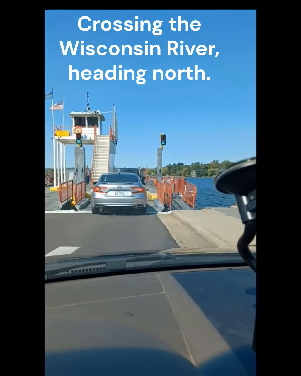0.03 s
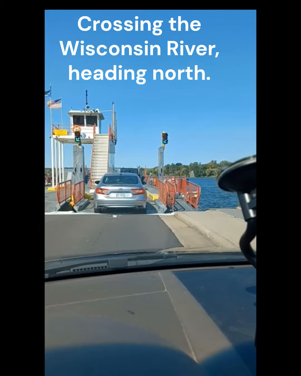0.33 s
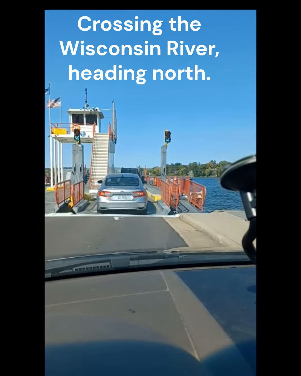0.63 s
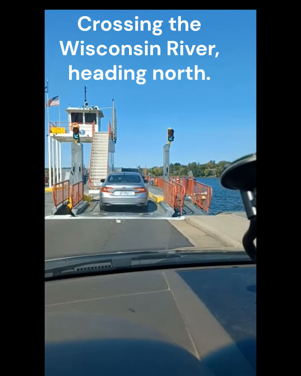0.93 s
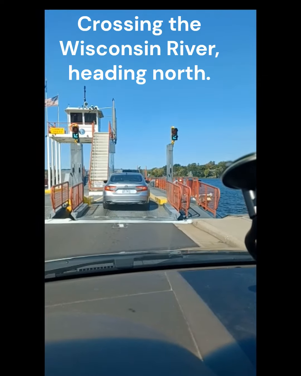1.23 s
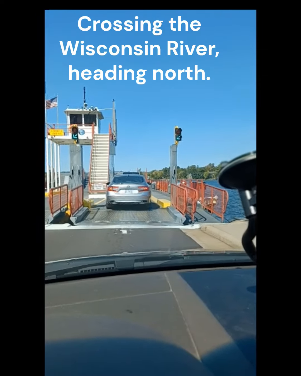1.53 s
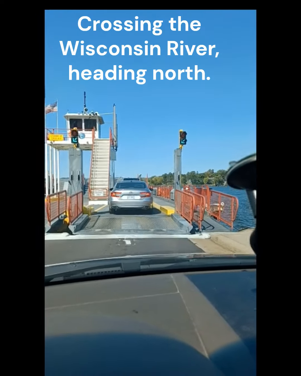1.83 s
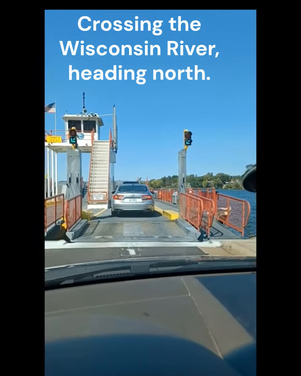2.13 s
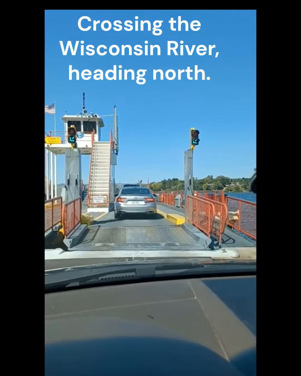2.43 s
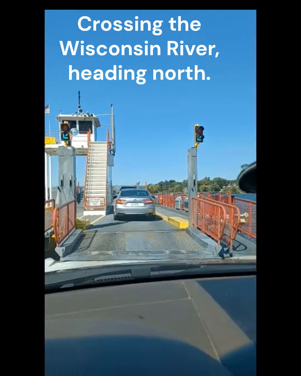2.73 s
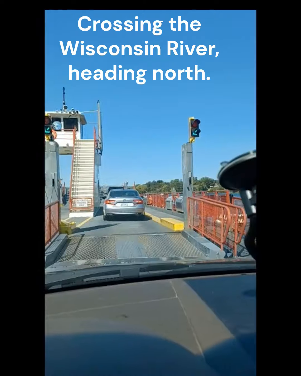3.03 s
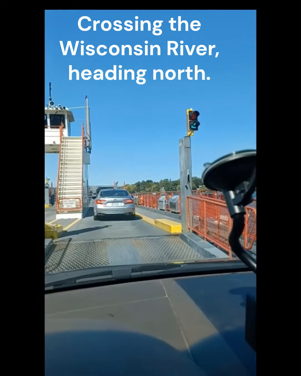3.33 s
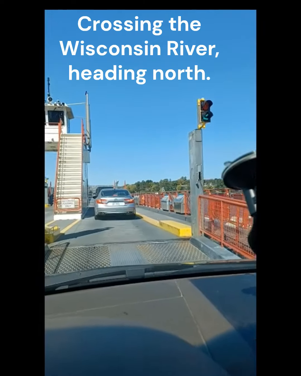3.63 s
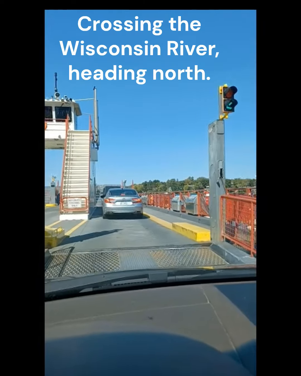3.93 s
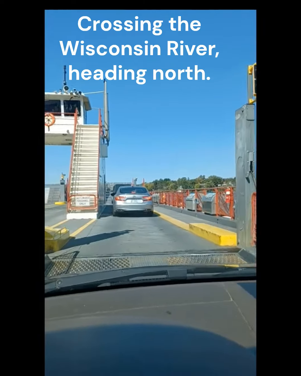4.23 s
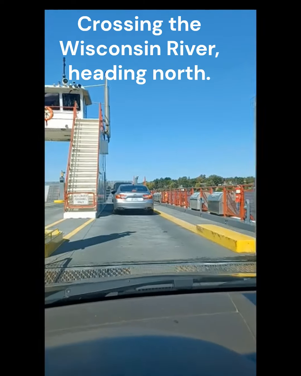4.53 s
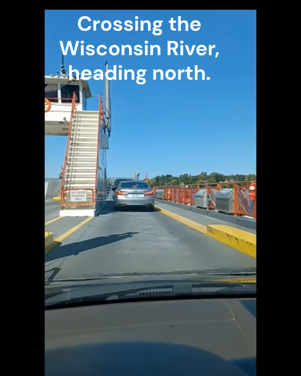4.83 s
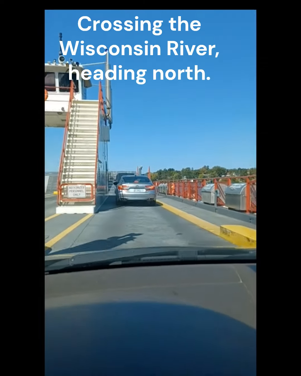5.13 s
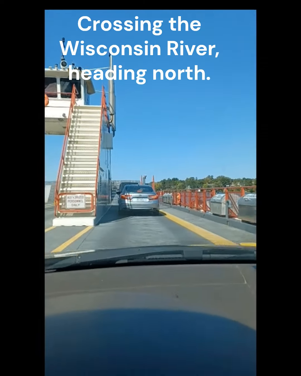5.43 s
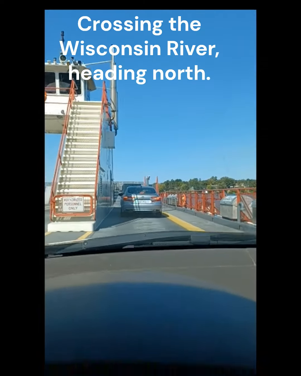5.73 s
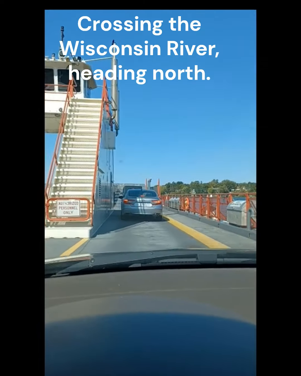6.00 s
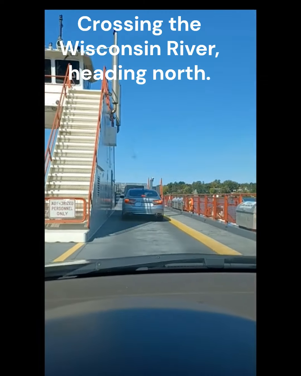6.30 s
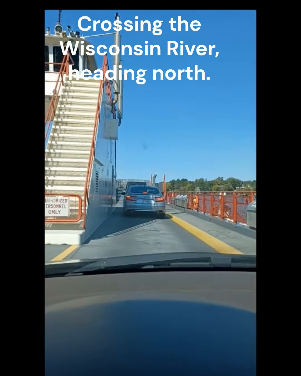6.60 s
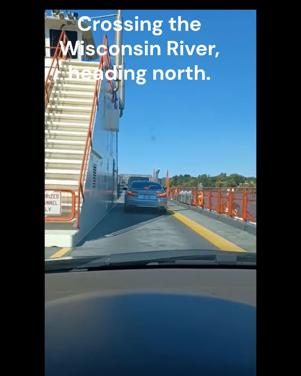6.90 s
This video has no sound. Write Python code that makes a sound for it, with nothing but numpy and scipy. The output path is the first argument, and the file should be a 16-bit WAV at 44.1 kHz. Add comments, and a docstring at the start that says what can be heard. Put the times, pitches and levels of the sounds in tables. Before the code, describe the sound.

A car rumbles onto a ferry, its wheels thudding and banging over loose, rattling metal plates, heard from the cabin.

```python
"""Hinged steel ramp plates bang under a car's wheels as it rolls slowly onto a ferry, heard from inside.
Each hit clashes, rings and booms in the cabin; the loose plates chatter as they settle.
Underneath is a bed of tyre rumble, air hiss and the drone of the ferry's diesel.
The trim buzzes, ticks and rubs, the engine swells once on the slope, and the tyres thud over ridges."""
import sys
import numpy as np
from scipy import signal
from scipy.fft import rfft, irfft
from scipy.io import wavfile
from scipy.ndimage import uniform_filter1d

SR = 44100
rng = np.random.default_rng(int(sys.argv[2]) if len(sys.argv) > 2 else 0)


def generate_wav(sig):
    """Save sig (samples, or channels by samples) to the path in sys.argv[1] as 16-bit PCM at SR."""
    pcm = np.round(np.clip(np.atleast_2d(sig).T, -1, 1) * 32767).astype(np.int16)
    wavfile.write(sys.argv[1], SR, pcm)


N = 315756
TIME = np.arange(N) / SR
FREQS = np.fft.rfftfreq(N, 1 / SR)


def amp(db):
    """Decibels to gain."""
    return 10 ** (np.asarray(db) / 20)


def unit(x):
    """Scales to rms 1."""
    return x / np.sqrt(np.mean(x ** 2) + 1e-20)


def curve(points, hz):
    """Reads a breakpoint curve on a log-frequency axis."""
    f, value = np.transpose(points)
    return np.interp(np.log(hz + 1), np.log(f + 1), value)


def bells(rows, hz):
    """Bell EQ in dB, from rows of f/Hz, width/Hz, gain/dB."""
    return sum(db / (1 + (2 * (hz - centre) / width) ** 2) for centre, width, db in rows)


def treble_of(x, hz):
    """The part of a sound above hz."""
    size = x.shape[-1]
    return irfft(rfft(x) / (1 + (hz / (np.fft.rfftfreq(size, 1 / SR) + 1)) ** 4), size)


def drift(hz):
    """Random modulation of rms 1, up to about hz changes a second."""
    return unit(irfft(rfft(rng.standard_normal(N)) * np.exp(-(FREQS / hz) ** 2), N))


def envelope(t, attack, hold, t60):
    """Swells while a contact builds, holds while it lasts, then dies away."""
    return np.clip(t / attack, 0, 1) * amp(-60 * np.maximum(t - attack - hold, 0) / t60)


def add(mix, s, sound):
    """Lays a sound into the mix at time s."""
    part = mix[:, max(round(s * SR), 0):][:, :sound.shape[-1]]
    part += sound[..., :part.shape[1]]


# Stereo width of the cabin: f/Hz, side minus mid/dB
CABIN_WIDTH = [(60, -19), (150, -22), (300, -17), (600, -17), (1200, -3), (3000, -1), (15000, -3)]
def diffuse(pair, eq_db):
    """Spreads two unrelated signals as mid and side, as the cabin does: narrow bass, wide treble."""
    size = pair.shape[1]
    hz = np.fft.rfftfreq(size, 1 / SR)
    mid, side = rfft(pair)
    side = side * amp(curve(CABIN_WIDTH, hz))
    return unit(irfft(np.array([mid + side, mid - side]) * amp(eq_db(hz)), size))


def noise_band(size, centre_hz, octaves):
    """A rounded band of stereo noise, 6 dB down at the given octaves from its centre."""
    eq_db = lambda hz: -20 * np.log10(1 + (np.log2((hz + 1) / centre_hz) / octaves) ** 2)
    return diffuse(rng.standard_normal((2, size)), eq_db)


# The body shakes as an axle crosses a joint: t/s, level/dB, build-up/s
AXLE_JOLTS = [(4.68, -26, 0.21), (5.8, -34, 0.1), (7.02, -29.5, 0.25)]
def road_shake(start_db=-37, growth_db_per_s=0.29, settle_s=0.25):
    """Gain of the rolling: a slow climb from road to steel deck, with a swell at each joint."""
    power = amp(start_db + growth_db_per_s * TIME) ** 2
    for s, db, build in AXLE_JOLTS:
        swell = np.exp(-np.maximum((s - TIME) / build, (TIME - s) / settle_s))
        power += (amp(db) * swell) ** 2
    return np.sqrt(power)


# Low, heavy tyre spectrum: f/Hz, level/dB
RUMBLE_EQ = [(15, -44), (25, -28), (38, -20.5), (59, -10), (91, -1), (151, -5), (186, -3), (224, -5),
             (293, -16.5), (330, -12.5), (392, -21.5), (561, -25), (600, -24.5), (815, -24), (1320, -120)]
# Airy hiss spectrum: f/Hz, level/dB
HISS_EQ = [(240, -33), (400, 2.5), (560, -3), (749, -15.5), (821, -5.5), (1050, -6), (1470, -10.5),
           (2430, -17.5), (3360, -16.5), (5480, -22), (7100, -24.5), (8400, -31), (13300, -27),
           (15500, -38)]
# The cabin's peaks and dips in the hiss: f/Hz, width/Hz, gain/dB
CABIN_BELLS = [(754, 160, 1.5), (910, 140, 1.5), (1240, 210, -2.5), (1414, 18, 7.5), (1740, 70, -5),
               (1900, 81, 0), (3780, 130, -1)]
def tyres_and_air(lumps_db=1.0, flutter_db=1.0, air_db=-52, tyre_hiss_db=-25.5):
    """Lumpy tyre rumble comes through the body; the tyres add their own hiss to the steady air."""
    rumble = diffuse(rng.standard_normal((2, N)), lambda hz: curve(RUMBLE_EQ, hz))
    hiss = diffuse(rng.standard_normal((2, N)), lambda hz: curve(HISS_EQ, hz) + bells(CABIN_BELLS, hz))
    shake = road_shake()
    rumble *= shake * amp(lumps_db * drift(18))
    hiss *= (amp(air_db) + amp(tyre_hiss_db) * shake) * amp(flutter_db * drift(24))
    return rumble + hiss


def trim_buzz(relative_db=-23):
    """Loose trim buzzes faintly, riding the shake of the road."""
    return noise_band(N, centre_hz=1950, octaves=0.29) * road_shake() * amp(relative_db)


def ferry_diesel(hz=89.9, level_db=-49.5, waver=0.0118, throb_db=6.0):
    """The ferry's diesel drones on one low note that wavers and throbs."""
    phase = 2 * np.pi * np.cumsum(hz * (1 + waver * drift(4.7))) / SR
    return amp(level_db + throb_db * drift(7.9)) * unit(np.sin(phase))


def contact_swarm(per_s=650, spread_db=1.5, t60=0.092, spots=3):
    """Small random contacts land on a few spots, each with its own noisy clink."""
    t = np.arange(SR // 4) / SR
    contacts = (rng.random(N) < per_s / SR) * rng.choice([-1, 1], N)
    contacts = contacts * amp(spread_db * np.minimum(rng.exponential(1, N), 3))
    spot = rng.integers(0, spots, N)
    clinks = rng.standard_normal((spots, 2, len(t))) * amp(-60 * t / t60)
    return sum(signal.oaconvolve((contacts * (spot == k))[None], clink, axes=1)[:, :N]
               for k, clink in enumerate(clinks))


# Spectrum of bouncing steel: f/Hz, level/dB
CHATTER_EQ = [(29, -41), (50, -6), (124, 1), (404, -5.5), (477, -13), (551, -7), (870, -15.5), (935, -14),
              (1510, -17), (1880, -16.5), (3670, -24), (5260, -25.5), (9140, -43), (12800, -35.5),
              (15500, -49)]
# Metallic peaks of the two plates: f/Hz, width/Hz, gain on plate 0/dB, gain on plate 1/dB
CHATTER_BELLS = [(571, 13, 5, -1), (940.5, 25, 12.5, 11), (1287, 33, 5.5, 2), (1610, 72, 8, 11),
                 (1839, 58, 11, 4), (1986, 69, 4, 8.5), (2305, 60, 5, 6), (2540, 310, 1, 7),
                 (3300, 350, 2, 5.5)]
# Plates settling: t/s, level/dB, attack/s, hold/s, rattle tail/dB, brightness/dB, plate (0 or 1)
CHATTER_CUES = [(-.2, -35.5, 0.052, 0.093, -17, 2, 1), (0.673, -38, 0.047, 0.11, -15, -1.5, 1),
                (4.819, -24, 0.037, 0.084, -8, 6, 0), (5.697, -24, 0.041, 0.084, -12.5, 5, 1)]
def plate_chatter(bounce_t60=0.5, tail_t60=4.1, bright_attack=0.045, bright_t60=0.36, dull_db=-14):
    """Loose plates bounce hard and bright, then linger in a dull rattle that comes in fits."""
    out, swarm = np.zeros((2, N)), contact_swarm()
    fits_db = 1.5 * drift(12)
    for s, db, attack, hold, tail_db, bright_db, plate in CHATTER_CUES:
        peaks = [(hz, width, gains[plate]) for hz, width, *gains in CHATTER_BELLS]
        steel = diffuse(swarm, lambda hz: curve(CHATTER_EQ, hz) + bells(peaks, hz))
        treble = treble_of(steel, hz=3800)
        age = TIME - s
        tail = amp(tail_db + fits_db) * envelope(age, attack, hold, tail_t60)
        body_gain = np.hypot(envelope(age, attack, hold, bounce_t60), tail)
        hard_contacts = envelope(age, bright_attack, attack + hold - bright_attack, bright_t60)
        treble_gain = np.hypot(amp(bright_db) * hard_contacts, amp(dull_db) * tail)
        out += amp(db) * (body_gain * (steel - treble) + treble_gain * treble)
    return out


# Spectrum of steel on steel: f/Hz, level/dB
CLASH_EQ = [(59, -68), (100, -1.5), (123, -20), (196, -16), (238, -23), (293, -11), (508, -10.5),
            (727, -13), (998, -9), (1110, -12), (1310, -14.5), (3050, -14.5), (7730, -30.5), (12600, -34.5),
            (15500, -42)]
# Its decay, shorter at the top: f/Hz, t60/s
CLASH_DECAY = [(150, 0.47), (600, 0.47), (2000, 0.36), (5000, 0.31), (13000, 0.28)]
def steel_clash(t, attack, hold, tilt_db, peaks, treble_hz=5500, treble_rise_s=0.007):
    """Steel slaps steel: modes so dense that they blur into noise, the highs dying first."""
    eq_db = lambda hz: curve(CLASH_EQ, hz) + tilt_db * np.log2((hz + 100) / 1500) + bells(peaks, hz)
    noise = diffuse(rng.standard_normal((2, len(t))), eq_db)
    hz, age, bands = signal.stft(noise, SR, nperseg=256)
    fade = amp(-60 * np.maximum(age - attack - hold, 0) / curve(CLASH_DECAY, hz)[:, None])
    clash = signal.istft(bands * fade, SR, nperseg=256)[1][:, :len(t)] * np.clip(t / attack, 0, 1)
    # the clash's treble fades in over a few milliseconds
    return clash - treble_of(clash, treble_hz) * np.exp(-t / treble_rise_s)


def ring(modes, place, t, attack, hold, waver_hz):
    """Decaying modes; the place of the blow sets their strength, the rolling load can bend their pitch."""
    out = np.zeros((2, len(t)))
    for hz, t60, edge_db, middle_db in modes:
        waver = waver_hz * unit(uniform_filter1d(rng.standard_normal(len(t)), size=900))
        phase = 2 * np.pi * (np.cumsum(hz + waver) / SR + rng.random())
        # each mode arrives from its own side
        spread = amp(curve(CABIN_WIDTH, hz)) * rng.choice([-1, 1]) * np.array([[1], [-1]])
        gain = amp(edge_db + place * (middle_db - edge_db))
        out += gain * envelope(t, attack, hold, t60) * np.sin(phase + spread)
    return out


# Ring of the steel plate: f/Hz, t60/s, level for an edge hit/dB, level for a middle hit/dB
PLATE_MODES = [(182.7, 0.11, -3.5, 2.5), (233.3, 0.41, -1, -24), (335, 0.51, -10.5, -15),
               (367.4, 0.5, -11, -25), (459, 0.45, -6, -26), (510, 0.41, -5, -5.5), (629, 0.29, -9.5, -12),
               (912, 0.39, -11, -9), (1000, 0.49, -93, -27.5), (1122, 0.11, -28, -8),
               (1283, 0.1, -18.5, 5.5), (1410, 0.1, -48, -14), (1626, 0.32, -9.5, -15),
               (1903, 0.083, -4, -14), (2070, .22, -10, -14), (2270, 0.083, -7.5, -32),
               (2264, 0.2, -12, -2.5), (2355, 0.16, -9.5, -4), (2510, 0.19, -14.5, -3),
               (2580, 0.17, -5, -21), (2840, 0.27, -47, -3), (3020, .2, -60, -28), (3320, 0.18, -24, -4),
               (3230, .2, -74, -10), (3570, 0.094, -40, 0)]
# Boom of the cabin air: f/Hz, t60/s, level for an edge hit/dB, level for a middle hit/dB
CABIN_MODES = [(126.2, 0.57, 2.5, -2), (135.2, 0.18, -1, 9)]
# Plate hits: t/s, clash/dB, ring/dB, boom/dB, place (0 edge to 1 middle), attack/s, hold/s,
# tilt/(dB per octave), accent f/Hz, accent gain/dB
BANG_CUES = [(.559, -32.5, -39, -31, 0.36, 0.0053, 0.061, -0.5, 1800, 5),
             (4.6358, -16.5, -14, -15.5, 0.042, 0.004, 0.0046, 1, 450, 2),
             (5.506, -15, -14, -21, 0.71, 0.0022, 0.01, 0, 3100, -1),
             (5.709, -24, -42, -42, 0.93, 0.0049, 0.0079, 1, 2390, 13),
             (6.997, -19.5, -27.5, -31, 0.39, 0.024, 0.048, 0, 1520, 11.5)]
def plate_bangs(accent_width_hz=900, mode_width_hz=70, contrast=0.27, boom_attack=0.039):
    """A wheel slams a plate down in three layers: clash, plate ring and the cabin's slower boom."""
    out, t = np.zeros((2, N)), np.arange(SR) / SR
    for s, clash_db, ring_db, boom_db, place, attack, hold, tilt_db, accent_hz, accent_db in BANG_CUES:
        # the clash favours the modes that move most at the struck place
        peaks = [(hz, mode_width_hz, contrast * (place - .5) * (middle_db - edge_db))
                 for hz, _, edge_db, middle_db in PLATE_MODES]
        peaks.append((accent_hz, accent_width_hz, accent_db))
        add(out, s, amp(clash_db) * steel_clash(t, attack, hold, tilt_db, peaks))
        add(out, s, amp(ring_db) * ring(PLATE_MODES, place, t, attack, hold, waver_hz=7))
        add(out, s, amp(boom_db) * ring(CABIN_MODES, place, t, boom_attack, hold, waver_hz=0))
    return out


def trim_ticks(per_s=1.1, level_db=-55):
    """The trim ticks faintly at random."""
    tick = noise_band(SR, centre_hz=6500, octaves=0.8)
    tick *= envelope(np.arange(SR) / SR, attack=0.0011, hold=0, t60=0.06)
    triggers = amp(level_db) * (rng.random((1, N)) < per_s / SR)
    return signal.oaconvolve(triggers, tick, axes=1)[:, :N]


# Sharp little ticks: t/s, level/dB, f/Hz, t60/s
TICK_CUES = [(.875, -52, 6040, 0.039), (1.711, -42.5, 3300, 0.14), (1.714, -43.5, 11400, 0.19),
             (1.865, -48, 2200, .1), (1.982, -51, 5500, .08), (2.401, -40, 1410, .06),
             (2.4235, -37, 1720, 0.046), (3.285, -52, 5500, .05), (5.078, -50, 6000, .05)]
# Soft rubs and one thin squeak: t/s, level/dB, f/Hz, half width/octaves, attack/s, t60/s
RUB_CUES = [(3.03, -60.5, 12300, .4, .07, 1.6), (5.21, -37, 2200, 0.31, 0.032, 0.22),
            (5.307, -47, 13200, .04, .045, 0.1), (6.29, -50, 4950, 2.5, 0.044, 0.73),
            (6.743, -39.5, 2630, .9, 0.017, 0.31)]
def ticks_and_rubs(tick_octaves=0.53, tick_attack=0.0011):
    """Loose things tick and rub in the cabin, each a band of brief vibration."""
    out, t = np.zeros((2, N)), np.arange(SR) / SR
    ticks = [(s, db, hz, tick_octaves, tick_attack, t60) for s, db, hz, t60 in TICK_CUES]
    for s, db, hz, octaves, attack, t60 in ticks + RUB_CUES:
        add(out, s, amp(db) * noise_band(SR, hz, octaves) * envelope(t, attack, 0, t60))
    return out


def car_engine(peak_s=2.22, rise_s=0.33, fall_s=0.425, peak_db=-40.5, idle_hz=45, peak_hz=56):
    """One push on the throttle, up the ramp: firing rate and level follow the effort."""
    effort = np.exp(-((TIME - peak_s) / np.where(TIME < peak_s, rise_s, fall_s)) ** 2)
    firing_hz = idle_hz + (peak_hz - idle_hz) * effort
    waver = 1 + 0.0118 * drift(5.3)
    phase = 2 * np.pi * np.cumsum(firing_hz * waver) / SR
    return amp(peak_db) * effort * unit(np.sin(phase) + amp(-6) * np.sin(2 * phase))


# Low thumps over the ridges: t/s, level/dB, half length/s
THUD_CUES = [(4.51, -23.5, 0.035), (4.55, -11.5, .013), (4.59, -23, 0.02), (4.64, -12, .008),
             (5.43, -25, 0.04), (5.841, -17.5, 0.019), (6.894, -28.5, 0.065)]
def tyre_thuds(body_hz=89.8):
    """A tyre folds over a ridge and pushes a few slow cycles into the body."""
    return sum(amp(db) * np.exp(-((TIME - s) / half) ** 2) * np.cos(2 * np.pi * body_hz * (TIME - s))
               for s, db, half in THUD_CUES)


def scene():
    """The full mix behind the windscreen."""
    bed = tyres_and_air() + trim_buzz() + ferry_diesel()
    plates = plate_chatter() + plate_bangs()
    return bed + plates + trim_ticks() + ticks_and_rubs() + car_engine() + tyre_thuds()


# Balance of the two microphone ports: f/Hz, left minus right/dB
MIC_BALANCE = [(60, -1.5), (92, 1.5), (140, 0), (210, 1), (330, 2.5), (500, 4.5), (770, 4.5), (1170, -5),
               (1790, -6), (2740, 2), (4190, 4), (6410, 4.5), (9810, -0.5), (15000, -1)]
# Phase between the ports: f/Hz, left lead/rad
MIC_PHASE = [(250, 0.067), (500, -0.63), (950, -1.23), (1640, 0.85), (3000, 1.7), (6000, 1.9)]
def record(dry, cutoff_hz=15650):
    """Two microphone ports hear the cabin with their own level and phase; a steep low-pass follows."""
    left = amp(curve(MIC_BALANCE, FREQS) / 2) * np.exp(.5j * curve(MIC_PHASE, FREQS))
    ports = irfft(rfft(dry) * np.array([left, 1 / left]), N)
    lowpass = signal.firwin(511, cutoff_hz, window=("kaiser", 9), fs=SR)
    return signal.oaconvolve(ports, lowpass[None], "same")


dry = scene()
out = record(dry)
generate_wav(out)
```